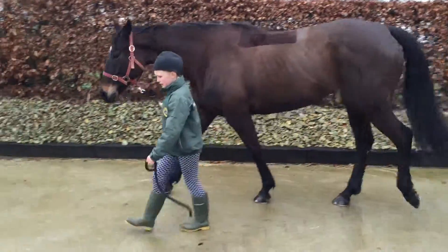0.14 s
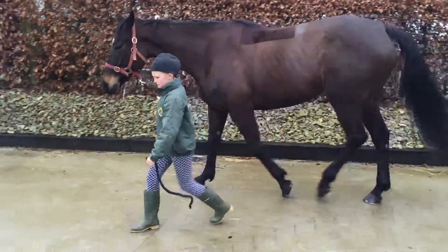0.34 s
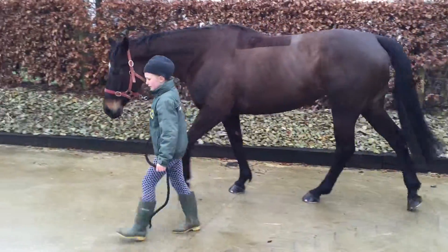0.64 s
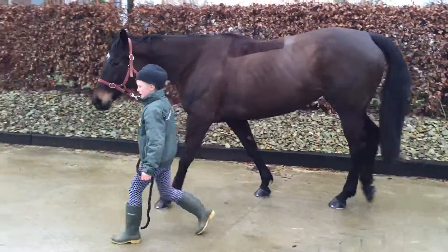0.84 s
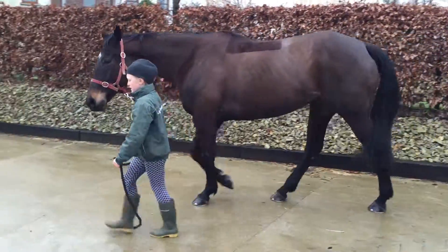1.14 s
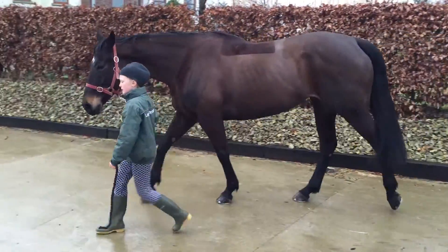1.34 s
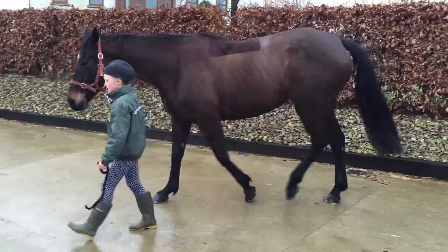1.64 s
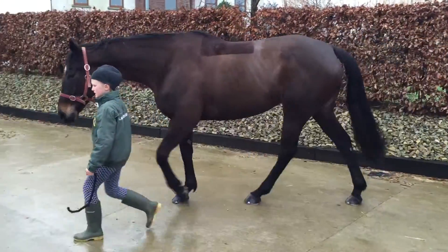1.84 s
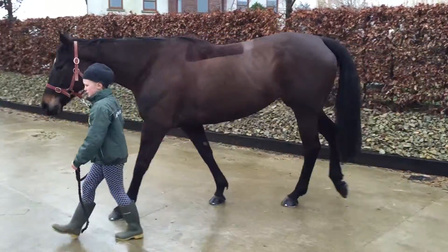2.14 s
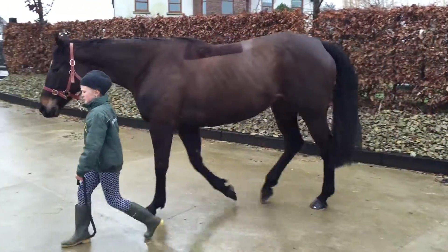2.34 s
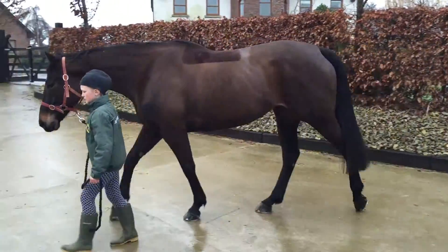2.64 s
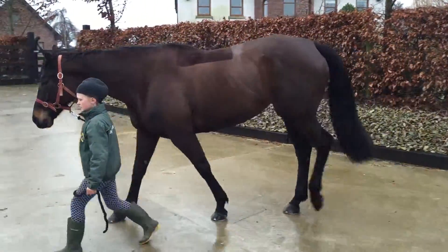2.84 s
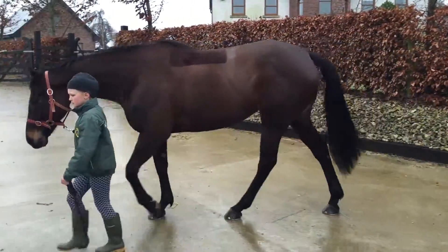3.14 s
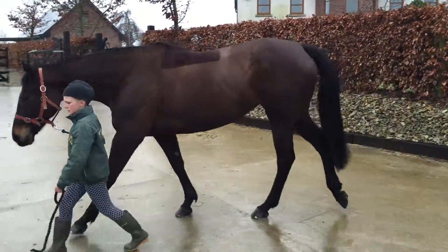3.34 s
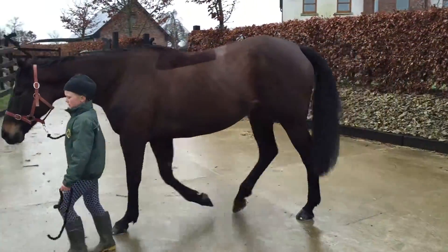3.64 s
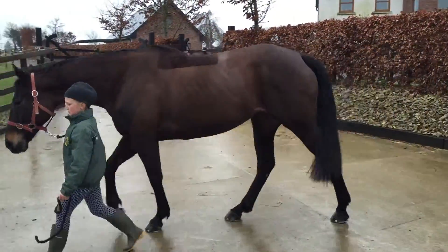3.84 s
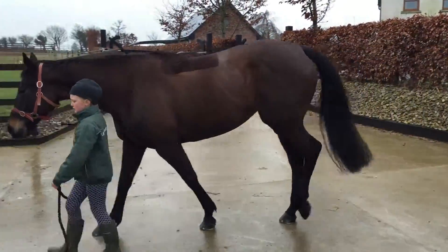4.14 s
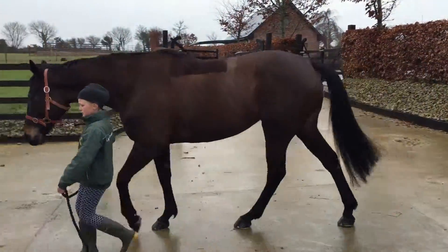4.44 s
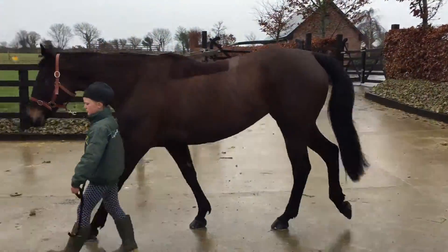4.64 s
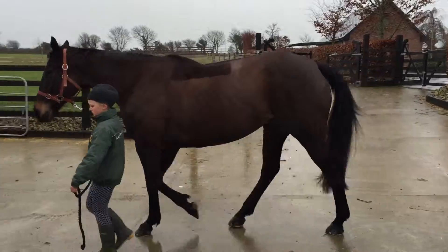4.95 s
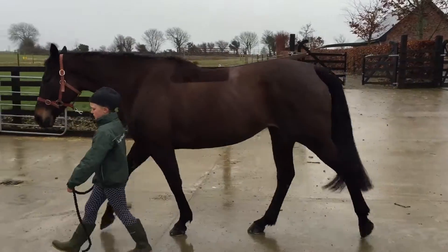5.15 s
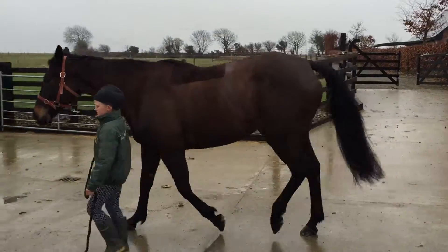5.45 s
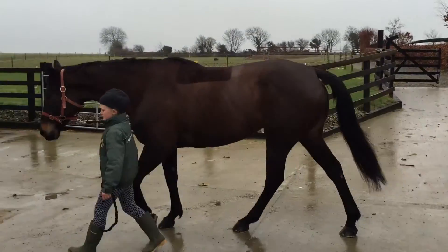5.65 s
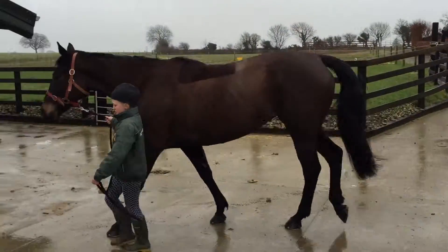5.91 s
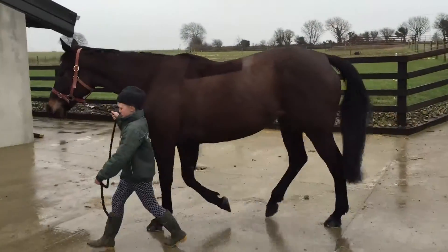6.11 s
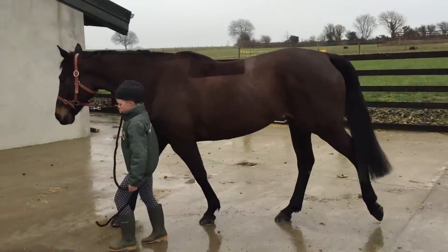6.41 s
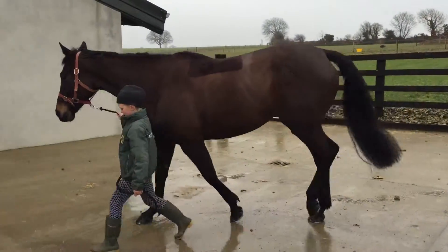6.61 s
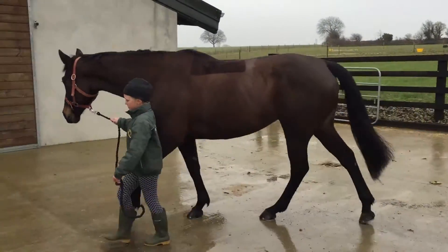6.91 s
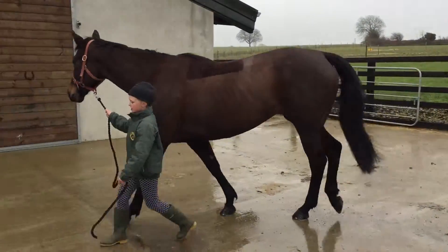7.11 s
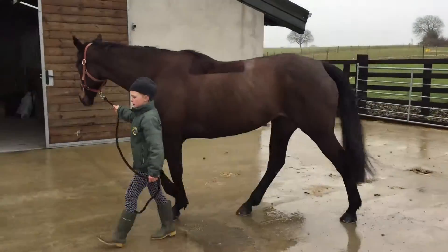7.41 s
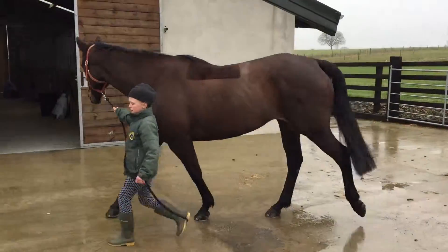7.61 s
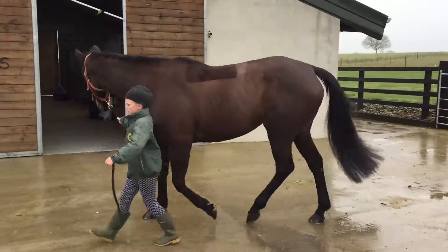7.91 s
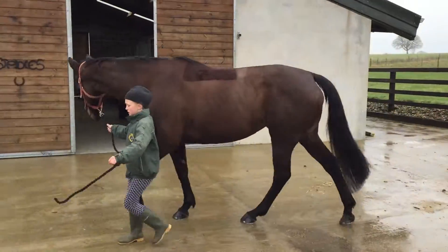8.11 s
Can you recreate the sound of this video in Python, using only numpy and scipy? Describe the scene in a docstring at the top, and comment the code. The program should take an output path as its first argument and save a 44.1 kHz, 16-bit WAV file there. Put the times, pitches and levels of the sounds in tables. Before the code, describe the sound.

Slow, even clip-clop of a led horse on wet paving, soft boot and hoof scrapes, a wall echo growing, distant traffic hum behind.

```python
"""Shod horse on wet concrete

A shod horse walks beside a handler in rubber boots: damped modes ring at each hoof contact, noise grains make
crushed grit and the scuffs of hooves and soles. A delayed copy is the slap off a barn, sooner as they near it;
noise tails are the yard. Wind buffets the microphone port; short low pulses are soft thumps. Traffic is shaped
noise and two hums far off; a small bird whistles in sines."""
import sys
import numpy as np
from scipy import signal
from scipy.fft import rfft, irfft, next_fast_len
from scipy.io import wavfile
from scipy.ndimage import uniform_filter1d, map_coordinates

SR = 44100
rng = np.random.default_rng(int(sys.argv[2]) if len(sys.argv) > 2 else 0)


def to_wav(sig):
    """Store sig (one row per channel, or 1-D mono) as 16-bit WAV at the path in sys.argv[1].

    Samples outside -1..1 are clipped; the rate is SR.
    """
    pcm = np.clip(np.atleast_2d(sig), -1, 1) * 32767
    pcm = np.round(pcm).astype(np.int16)
    wavfile.write(sys.argv[1], SR, pcm.T)  # frames by channels


N = 364707

# hoof contacts: (t/s, blow level/dB, pitch of the air cup under the sole f/Hz,
# shoe ring/dB re blow, grit/dB re blow)
HOOF_CONTACTS = [(0.0, -13.5, 620, -13, -14), (0.323, -13, 930, -26, -29), (0.331, -17, 912, -10.5, -19),
                 (0.637, -35.5, 1040, -12, -12), (0.647, -32, 1064, -15, -27),
                 (0.658, -18, 593, -4.5, -17.5), (0.957, -23.5, 970, -11, -14),
                 (0.964, -16.5, 640, -6.5, -12.5), (1.286, -25.5, 1010, -27, -9),
                 (1.305, -17, 600, -14, -14), (1.613, -11.5, 1080, -14.5, -26.5), (1.963, -51, 750, -3, -4),
                 (1.979, -22.5, 860, -12, -22), (1.991, -11, 493, -6.5, -21),
                 (2.241, -36, 1290, -22, -14.5), (2.257, -14, 705, -16, -20.5),
                 (2.65, -18.5, 917, -40, -13.5), (2.659, -16.5, 685, -13.5, -17),
                 (2.907, -43.5, 725, 0, -3), (2.918, -14, 660, -19.5, -18.5), (3.279, -29.5, 983, -9, -12),
                 (3.294, -11.5, 608, -6.5, -16), (3.583, -41, 940, -12, 0), (3.593, -21.5, 752, -7.5, -16),
                 (3.831, -39, 674, -13.5, -30), (3.933, -19.5, 965, -11, -17), (3.942, -11, 607, -11, -13),
                 (4.207, -44, 900, -13, -23), (4.213, -24.5, 820, -7, -13.5), (4.248, -28.5, 713, -15, -15),
                 (4.553, -29.5, 1320, -9, -3), (4.568, -11, 1236, -5, -12.5), (4.829, -26, 910, -12.5, -18),
                 (4.849, -19.5, 722, -15, -25.5), (5.174, -23, 950, -9.5, -11.5),
                 (5.184, -12, 476, -6.5, -18.5), (5.441, -30, 906, -16.5, -14),
                 (5.464, -30.5, 578, -10, -10.5), (5.744, -29.5, 690, -12.5, -10),
                 (5.771, -32.5, 1230, -8, -26.5), (5.795, -22, 540, -5, -10), (6.034, -31, 960, -22.5, -15),
                 (6.408, -26.5, 770, 3, -15), (6.411, -11.5, 552, -23, -12.5),
                 (6.639, -21, 783, -39.5, -44), (6.645, -24, 459, -6, -51), (6.946, -35, 747, -6.5, -9),
                 (7.212, -39, 1140, 3, -13), (7.226, -18.5, 832, -8, -21.5), (7.577, -28.5, 740, -4, -7),
                 (7.582, -15, 535, -29, -13.5), (7.826, -36, 900, -6.5, -24), (7.831, -14, 468, -6.5, -15),
                 (7.852, -32, 550, -8.5, -36), (8.191, -21, 910, -24, -28), (8.206, -17, 555, -3.5, -12.5)]


def amp(db):
    """Gain of a level in dB."""
    return 10 ** (np.asarray(db) / 20)


def unit(x):
    """Scaled to rms 1."""
    return x / np.sqrt(np.mean(x ** 2) + 1e-20)


def along(points, hz):
    """(f/Hz, value) points interpolated on a log frequency axis."""
    f, v = np.transpose(points)
    return np.interp(np.log(hz + 1), np.log(f + 1), v)


def curves(rows):
    """One value per sample for each column after the time."""
    s, *cols = np.transpose(rows)
    return [np.interp(np.arange(N) / SR, s, c) for c in cols]


def wobble(rate_hz):
    """Smooth random curve, rate_hz knots a second."""
    knots = rng.standard_normal(int(N * rate_hz / SR) + 4)
    return map_coordinates(knots, [np.arange(N) * rate_hz / SR])


def filtered(x, response):
    """x times a complex response of frequency."""
    m = next_fast_len(N + SR // 2)
    return irfft(rfft(x, m) * response(np.fft.rfftfreq(m, 1 / SR)), m)[:N]


def patchy(bins, frames, size, depth_db):
    """White noise whose gain varies in random patches of frequency and time."""
    z = signal.stft(rng.standard_normal(N + size), nperseg=size)[2]
    field = uniform_filter1d(rng.standard_normal(z.shape), bins, 0)
    field = uniform_filter1d(field, frames, 1)
    return signal.istft(z * amp(depth_db * unit(field)), nperseg=size)[1][:N]


def add(track, s, sound):
    """Mix a sound into a track at s seconds."""
    part = track[max(round(s * SR), 0):][:len(sound)]
    part += sound[:len(part)]


def ring(t, hz, t60_s, attack_s):
    """One damped mode with a soft start."""
    return amp(-60 * t / t60_s) * (1 - np.exp(-t / attack_s)) * np.sin(2 * np.pi * hz * t)


def grit_colour(hz):
    """Spectrum of crushed wet grit."""
    # (f/Hz, level/dB)
    grit_spectrum = [(1470, -5), (2500, -8.5), (2860, -9.5), (3770, -2.5), (4140, -4), (4480, -6.5),
                     (4930, -9), (6650, -7.5), (7370, -13), (11300, -20), (15100, -24), (16100, -26),
                     (16500, -36)]
    return amp(along(grit_spectrum, hz))


def crunch(spectrum, spread_db, lumpy_db):
    """Grains of very unequal size and colour through a spectrum, rms 1."""
    grains = patchy(bins=4, frames=3, size=128, depth_db=lumpy_db) * amp(spread_db * wobble(500))
    return unit(filtered(grains, spectrum))


def hooves():
    """Every contact rings the air cup and the shoe, crushes grit and thuds into the slab."""
    # modes of hoof wall and shoe: (f/Hz, level/dB, t60/s)
    shoe_modes = [(1108, 14, 0.011), (1351, 7, 0.015), (1796, 9.5, 0.014), (2007, 5, 0.015),
                  (2425, -18.5, 0.017), (3100, -1, 0.012), (2037, 5, 0.0043)]
    mode_scatter_db, mode_detune = 1.5, 0.03  # random spread per blow; detune as a share of f
    cup_cycles, longer_per_db = 15.36, 0.022  # cycles to -60 dB; more by this share per dB of softer blow
    # slab thud: 0 dB blow at the start; dB per dB of blow; rise as the horse comes closer
    thud_db, thud_db_per_db, thud_db_per_s = -29.5, 0.73, 1.87
    knocks, thuds, crush = np.zeros((3, N))
    t = np.arange(SR // 5) / SR
    chatter_n = SR // 25
    for s, db, cup_hz, shoe_db, grit_db in HOOF_CONTACTS:
        cup_t60_s = cup_cycles / cup_hz * (1 - longer_per_db * db)
        chance = rng.standard_normal((len(shoe_modes) + 1, 2))

        # the blow, then a chatter of small slips as the hoof seats
        slips = rng.standard_normal(chatter_n) * (rng.random(chatter_n) < 0.012)
        blow = amp(-4.5 - 60 * t[:chatter_n] / 0.044) * slips
        blow[0] = 1

        cup = ring(t, cup_hz, cup_t60_s, 0.00038)
        # the hoof spreads under load: a neighbouring pitch beats with the cup
        beat_hz = cup_hz * (1.163 + 0.14 * chance[-1, 1])
        cup += amp(4.5 + 2 * chance[-1, 0]) * ring(t, beat_hz, 0.45 * cup_t60_s, 0.0016)

        shoe = np.zeros(len(t))
        for (hz, level_db, t60_s), (a, b) in zip(shoe_modes, chance):
            shoe += amp(level_db + mode_scatter_db * a) * ring(t, hz * (1 + mode_detune * b), t60_s, 0.0013)
        add(knocks, s, amp(db) * signal.fftconvolve(blow, cup + amp(shoe_db) * shoe))

        thud = ring(t, 116, 0.093, 0.006) + amp(-0.5) * ring(t, 151.5, 0.059, 0.0006)
        add(thuds, s, amp(thud_db + thud_db_per_db * db + thud_db_per_s * s) * thud)

        # a sharp crack, then wet grit settling
        crack_and_settle = amp(-60 * t / 0.023) + amp(-9.0 - 60 * t / 0.11)
        add(crush, s, amp(db + grit_db) * (1 - np.exp(-t / 0.00044)) * crack_and_settle)

    def radiation(hz):
        """A hoof is too small to radiate below its cup."""
        return (1j * hz / (260 + 1j * hz)) ** 2

    return filtered(knocks, radiation) + thuds + crush * crunch(grit_colour, spread_db=4.5, lumpy_db=-2.0)


def scuffs():
    """A slide of hoof or boot sole bites (long ones more gently), drags unevenly and lets go."""
    # (t/s, length/s, level/dB, brightness: fizz/dB re level)
    slides = [(0.133, 0.023, -59, -9.5), (0.353, 0.071, -53.5, -10), (0.46, 0.078, -65, -3),
              (0.632, 0.052, -47, -2.5), (0.851, 0.026, -62, -1), (0.998, 0.02, -64.5, 11),
              (1.032, 0.043, -53, -17), (1.281, 0.028, -41.5, -9), (1.351, 0.039, -56, -5),
              (1.659, 0.063, -50, -10.5), (1.689, 0.0094, -52, 4.5), (1.851, 0.097, -49.5, -15.5),
              (2.063, 0.046, -55.5, -32), (2.32, 0.023, -54.5, -2), (2.354, 0.0084, -66, 6),
              (2.648, 0.034, -35, -20), (2.819, 0.013, -42.5, 5.5), (2.832, 0.031, -50.5, -1.5),
              (2.86, 0.075, -57.5, -14), (2.988, 0.033, -54, -5), (3.027, 0.03, -74, 9.5),
              (3.085, 0.018, -60, 6.5), (3.367, 0.042, -53.5, -14), (3.532, 0.009, -57, -20),
              (3.641, 0.027, -54.5, -2.5), (3.912, 0.039, -52.5, -14), (4.073, 0.051, -55.5, -16.5),
              (4.222, 0.075, -44.5, -8), (4.29, 0.0091, -61, 7), (4.337, 0.006, -55, 9.5),
              (4.365, 0.031, -54, -5), (4.401, 0.031, -56, -16), (4.439, 0.016, -50.5, -10),
              (4.515, 0.011, -43, -7), (4.81, 0.092, -44.5, -12.5), (4.973, 0.036, -56.5, -5.5),
              (5.397, 0.019, -51, -26), (5.431, 0.097, -51, -5), (5.576, 0.037, -71.5, 7.5),
              (5.771, 0.023, -35, -8.5), (6.03, 0.062, -39.5, -5), (6.358, .009, -55, -9),
              (6.422, 0.03, -42, -7), (6.624, 0.092, -53.5, 2), (6.753, 0.062, -58.5, 3),
              (6.783, 0.018, -56, -5.5), (6.949, 0.082, -35.5, -10), (6.979, 0.036, -34.5, -27),
              (7.083, 0.023, -52.5, -12), (7.237, 0.063, -44, -16.5), (7.381, 0.013, -57, -7.5),
              (7.558, 0.018, -54, -6), (7.588, 0.049, -43, -16), (7.848, 0.066, -42.5, -16),
              (7.92, 0.1, -49.5, -34), (8.108, 0.053, -63, -3), (8.17, 0.031, -52, -3.5),
              (8.242, 0.018, -43, -15)]
    # resonances that a slide excites in hoof and sole: (f/Hz, width/Hz, level/dB)
    body_modes = [(608, 200, -6), (947, 220, -1.5), (1494, 404, -7.5), (1840, 660, -7)]
    grit_db, grit_db_per_db = 0, 0.72  # coarse grit re slide level; dB per dB of brightness
    fizz, grit, body = np.zeros((3, N))
    for s, length_s, db, bright_db in slides:
        u = np.arange(round(2 * length_s * SR)) / (length_s * SR)
        stroke = np.clip(u / 0.14, 0, 1) * np.exp(-u ** 3.07)
        add(fizz, s, amp(db + bright_db) * stroke)
        add(grit, s, amp(db + grit_db + grit_db_per_db * bright_db) * stroke)
        add(body, s, amp(db) * stroke)

    def fine(hz):
        """Share of the grit spectrum that is fizz: the part above 5.6 kHz."""
        return 1 / (1 + (5600 / (hz + 1)) ** 8)

    def resonance(f):
        """Band-pass modes of alternating sign."""
        total = 0
        for k, (centre, width, db) in enumerate(body_modes):
            damping = 1j * f * width
            total = total + (-1) ** k * amp(db) * damping / (centre ** 2 - f ** 2 + damping)
        return total

    fizz *= crunch(lambda hz: grit_colour(hz) * fine(hz), spread_db=3, lumpy_db=4)
    grit *= crunch(lambda hz: grit_colour(hz) * (1 - fine(hz)), spread_db=2.5, lumpy_db=6.0)
    body *= crunch(resonance, spread_db=1.5, lumpy_db=0.5)
    return amp(2.04 * wobble(70)) * (fizz + grit + body)


def wall(x):
    """Slap off the barn: later, weaker, bass lost round the corner, sooner for fore hooves; returns twice."""
    # slap level: (t/s, level/dB)
    slap_levels = [(0, -44), (1.9, -27), (3.2, -14.5), (6.6, -9.5), (7.2, -12.5), (8.27, -23)]
    path_start_m, closing_m_per_s, fore_nearer_m = 19.9, 1.5, 1.6  # extra path, its shrinkage
    step_gap_s = 0.15  # a longer pause starts a new step: hind and fore take turns
    again_db = -12.5  # second return, after twice the path
    t = np.arange(N) / SR
    landings_s = np.transpose(HOOF_CONTACTS)[0]
    steps_s = landings_s[1:][np.diff(landings_s) > step_gap_s]
    fore = np.searchsorted(steps_s, t) % 2
    delay_s = (path_start_m - closing_m_per_s * t - fore_nearer_m * fore) / 343  # speed of sound, m/s
    once = map_coordinates(x, [(t - delay_s) * SR], order=1)
    twice = map_coordinates(x, [(t - 2 * delay_s) * SR], order=1)

    def reflection(hz):
        """High-pass at 500 Hz, low-pass at 6 kHz."""
        return (1j * hz / (500 + 1j * hz)) ** 2 / (1 + 1j * hz / 6000)

    return amp(curves(slap_levels)[0]) * filtered(once + amp(again_db) * twice, reflection)


def yard(x):
    """Scattered returns from fences and buildings; a new noise tail each 1/4 s as the horse moves on."""
    # (f/Hz, t60/s)
    yard_decay = [(150, 0.71), (700, 0.28), (2000, 0.39), (5000, 0.38), (13000, 0.25)]
    out, hop = np.zeros(N), SR // 4
    for start in range(0, N, hop):
        hz, t, z = signal.stft(rng.standard_normal(SR // 2), SR, nperseg=256)
        # separate returns of unequal colour
        lumps = uniform_filter1d(rng.standard_normal(z.shape), size=9, axis=0)
        decay_db = 60 * t / along(yard_decay, hz)[:, None]
        tail = signal.istft(z * amp(4.6 * unit(lumps) - decay_db), SR, nperseg=256)[1]
        tail /= np.linalg.norm(tail)
        add(out, start / SR + 0.008, signal.fftconvolve(x[start:start + hop], tail))
    return out


def bird():
    """Thin, slightly unsteady rising whistles from afar."""
    # (t/s, length/s, mid-note f/Hz, level/dB before the waver)
    notes = [(.135, 0.073, 4200, -61), (0.274, 0.085, 3170, -65), (.44, 0.047, 3270, -69),
             (0.736, 0.21, 3233, -64), (3.034, 0.098, 4215, -68), (3.195, 0.043, 4180, -66),
             (3.5, 0.14, 4160, -70), (6.295, 0.093, 4200, -69.5)]
    rise_hz_per_s, edge_power = 250, 0.4  # edge_power: softness of a note's ends
    out, waver = np.zeros(N), wobble(65)
    for s, length_s, note_hz, db in notes:
        n = round(length_s * SR)
        hz = note_hz + rise_hz_per_s * (np.arange(n) - n / 2) / SR
        hz = hz + 30 * waver[round(s * SR):][:n]
        add(out, s, amp(db) * np.hanning(n) ** edge_power * np.sin(2 * np.pi * np.cumsum(hz) / SR))
    return out * amp(3 * wobble(44))


def wind():
    """Gusty buffeting of the port as shaped low noise; separate soft low thumps as Gaussian pulses."""
    # (t/s, buffet level/dB)
    wind_levels = [(0.0, -52.5), (5.0, -60.5), (5.39, -53.5), (6.7, -80), (8.27, -84)]
    # buffet spectrum: (f/Hz, level/dB per Hz)
    buffet_spectrum = [(15, -34.5), (35, -15), (60, 2.5), (100, -11), (160, -8.5), (300, -27), (600, -63)]
    # (middle t/s, peak/dB, f/Hz)
    thumps = [(.394, -43.5, 86), (0.539, -45.5, 78), (0.784, -31.5, 72), (1.02, -39.5, 70),
              (1.205, -40.5, 74), (1.554, -47.5, 67), (1.654, -39, 67), (1.92, -37.5, 85),
              (2.074, -43.5, 88), (2.42, -46.5, 64), (4.257, -41, 108), (5.276, -35, 82),
              (5.605, -49.5, 66), (7.006, -38, 120), (7.195, -36.5, 98), (7.252, -33, 84), (8.148, -44, 68)]
    gust_db, half_s = 5, 0.052  # gust depth; half length of a thump
    noise = filtered(rng.standard_normal(N), lambda hz: amp(along(buffet_spectrum, hz)))
    out = amp(curves(wind_levels)[0]) * unit(amp(gust_db * wobble(13)) * noise)
    t = np.arange(-half_s, half_s, 1 / SR)
    for s, db, hz in thumps:
        add(out, s - half_s, amp(db) * np.exp(-(4.7 * t / half_s) ** 2) * np.cos(2 * np.pi * hz * t))
    return out


def air():
    """Far traffic and open-air hiss: noise in slow patches, with two narrow wavering hums."""
    # hiss spectrum: (f/Hz, level/dB per Hz)
    air_spectrum = [(35, -42), (60, 1.5), (98, -1), (161, -7.5), (229, -7.5), (393, -18), (983, -14.5),
                    (1430, -18), (1770, -20), (2640, -27.5), (4120, -26.5), (4860, -33.5), (6450, -31),
                    (15000, -39), (16500, -65)]
    # far hums before the waver: (t/s, 151 Hz level/dB, 92 Hz level/dB)
    hum_levels = [(0, -77, -88), (2, -68, -118), (4.3, -59, -69.5), (4.8, -64, -62), (8.27, -65, -64)]
    hiss_db, hum_waver_db = -60, 3
    noise = patchy(bins=6, frames=14, size=512, depth_db=3.0)
    out = amp(hiss_db) * unit(filtered(noise, lambda hz: amp(along(air_spectrum, hz))))
    t = np.arange(N) / SR
    for db, hz in zip(curves(hum_levels), (151, 92)):
        phase_rad = 2 * np.pi * hz * t + 1.97 * wobble(11)
        out += amp(db + hum_waver_db * wobble(7.4)) * np.sin(phase_rad)
    return out


def scene():
    """Steps, their slap, the bird and the yard over the open air and wind."""
    steps, song = hooves() + scuffs(), bird()
    steps = steps + wall(steps)
    scattered = yard(amp(-17) * steps + amp(-3.5) * song)
    return (steps + song + scattered + air() + wind())[None]


def record(dry):
    """One microphone: treble falls away over the last 900 Hz below its band limit."""
    top_hz = 16700
    return filtered(dry[0], lambda hz: np.clip((top_hz - hz) / 900, 0, 1) ** 2)[None]


dry = scene()
out = record(dry)
to_wav(out)
```